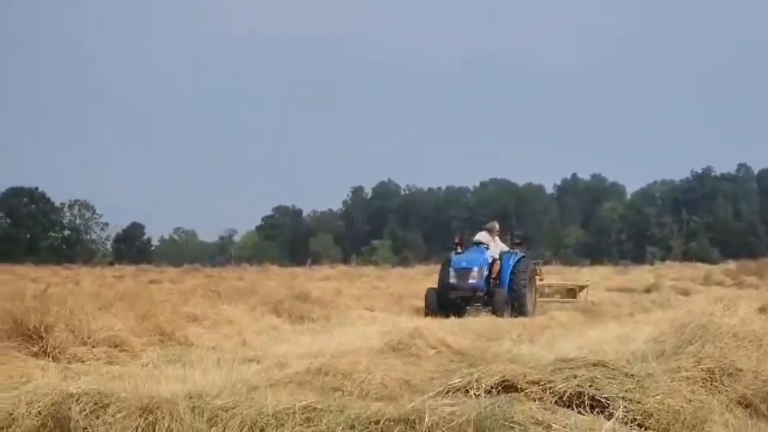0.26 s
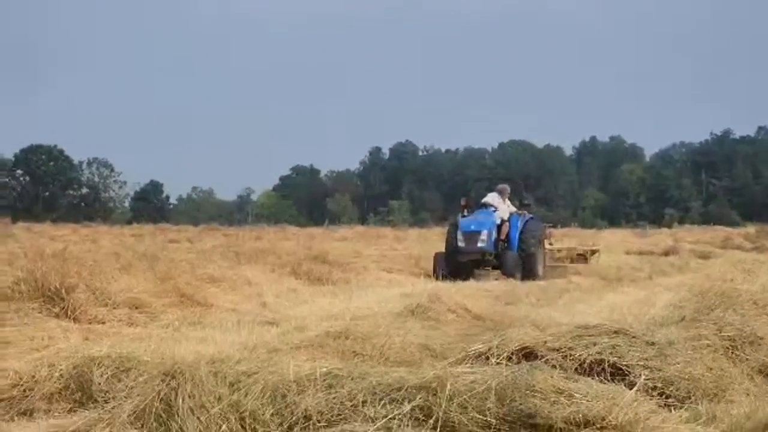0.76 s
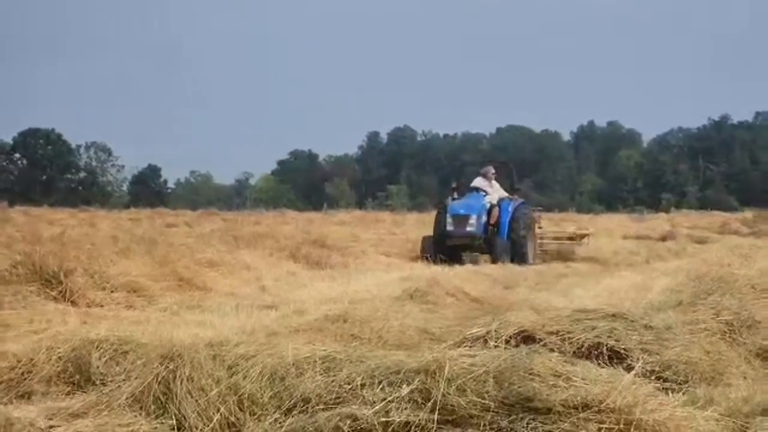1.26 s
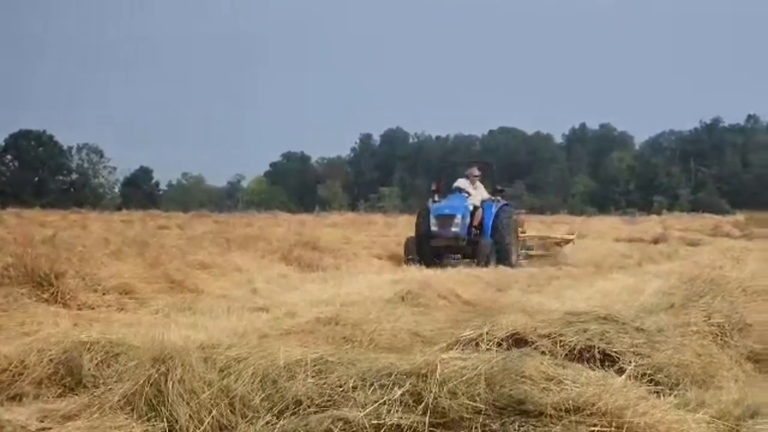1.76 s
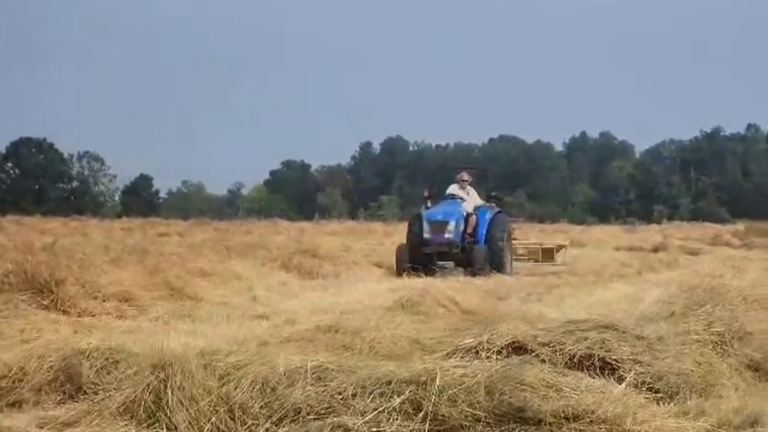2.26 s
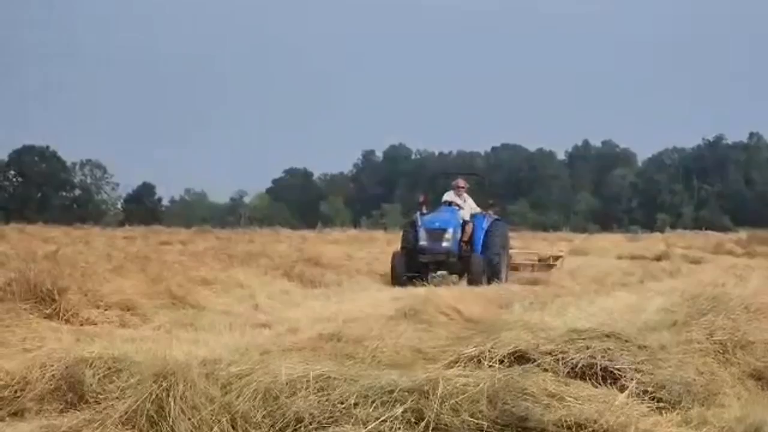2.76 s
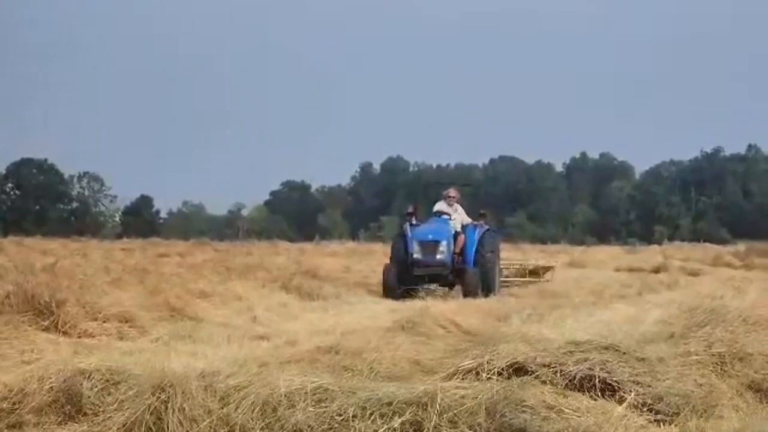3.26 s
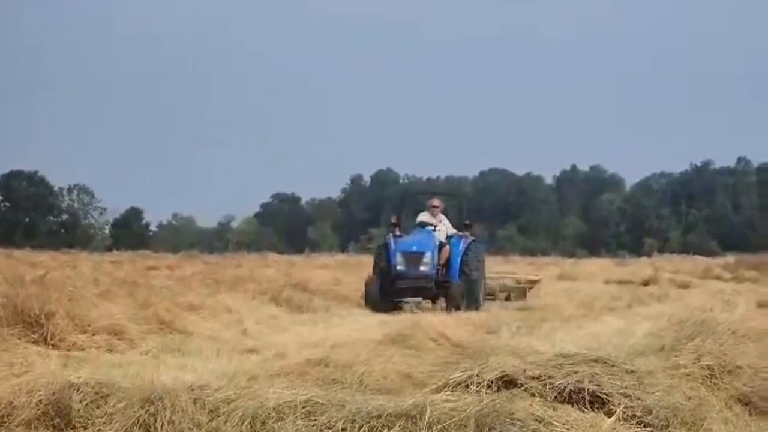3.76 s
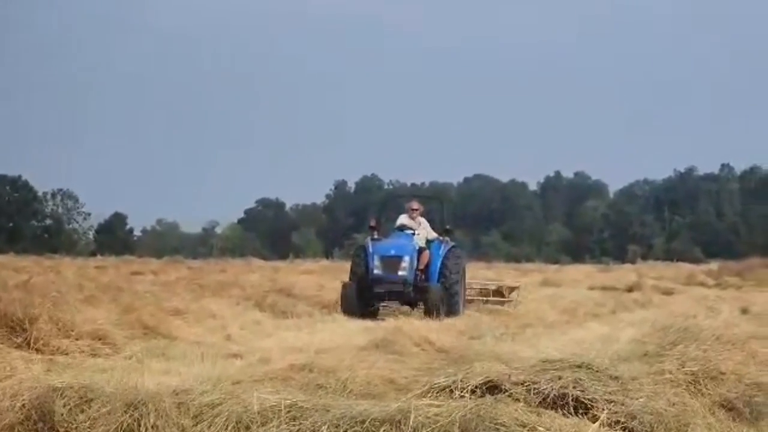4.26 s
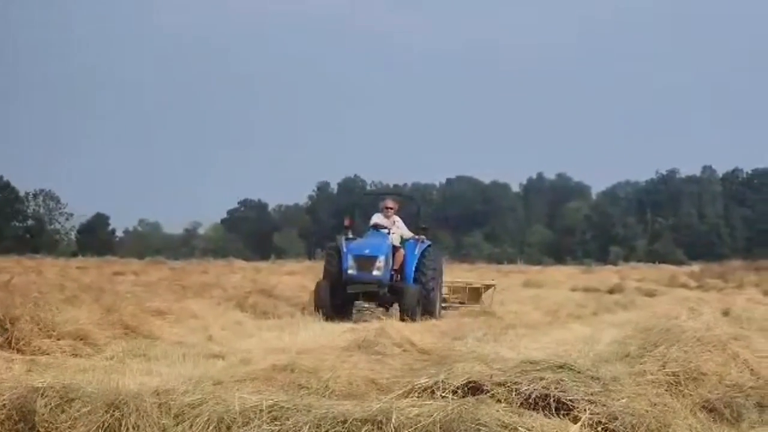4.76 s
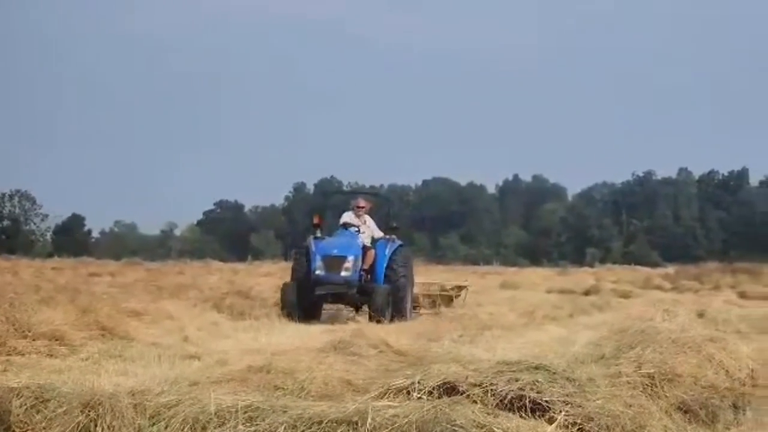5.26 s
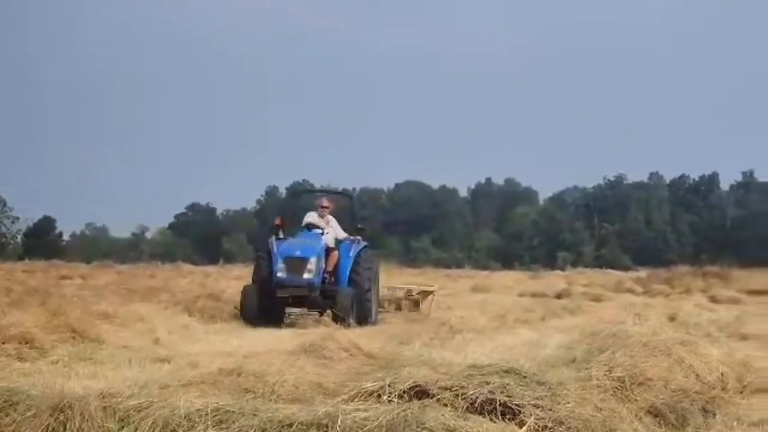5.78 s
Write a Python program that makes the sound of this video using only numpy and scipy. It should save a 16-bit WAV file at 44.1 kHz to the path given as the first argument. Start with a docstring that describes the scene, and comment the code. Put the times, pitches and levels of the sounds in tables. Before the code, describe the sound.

Outdoors in an open hay field, a diesel tractor drones steadily some distance off, gradually growing stronger as it nears. Rapid soft engine knocking blends with grainy mid-range clatter and irregular clanks from the towed rake, hardest around four and a half seconds. Close to the handheld stereo microphone, the breeze rumbles and thumps, dry straw rustles faintly, and a thin hiss remains.

```python
"""A low, uneven engine hum runs throughout under a rumbling breeze: a diesel tractor draws a hay rake across
an open field towards a hand-held pair of microphone ports. Its exhaust is a few wavering sines over
turbulence, its block is noise puffing with each knock; rake clanks and the loudest knocks are short bursts.
Close by, the breeze buffets the ports as low noise and single pulses, and dry straw rustles in tiny snaps.
The ports drop the deepest bass and add a faint, flickering hiss."""
import sys
import numpy as np
from scipy import signal
from scipy.fft import rfft, irfft
from scipy.io import wavfile
from scipy.ndimage import uniform_filter1d, map_coordinates

SR = 44100
rng = np.random.default_rng(int(sys.argv[2]) if len(sys.argv) > 2 else 0)


def wrap_up_sound(samples):
    """Save the sound to the file named by the first command line argument, as 16-bit audio."""
    columns = np.atleast_2d(samples).T
    # keep every value between -1 and 1, then stretch to whole-number steps
    tamed = np.clip(columns, -1, 1)
    steps = np.round(tamed * 32767).astype(np.int16)
    wavfile.write(sys.argv[1], SR, steps)


N = 265570


def gain_of(db):
    """Decibels to an amplitude factor."""
    return 10 ** (np.asarray(db) / 20)


def evened(x):
    """Scales to rms 1, taking all rows together."""
    return x / np.sqrt(np.mean(x ** 2) + 1e-20)


def read(points, column=1):
    """A column of a spectrum table at every bin, interpolated on a log-frequency axis."""
    table = np.array(points, float)
    bins_hz = np.fft.rfftfreq(N, 1 / SR)
    return np.interp(np.log(bins_hz + 1), np.log(table[:, 0] + 1), table[:, column])


def follow(rows):
    """The columns of a time table at every sample."""
    times_s, *columns = np.transpose(rows)
    return [np.interp(np.arange(N) / SR, times_s, column) for column in columns]


def coloured(x, points):
    """Filters by a spectrum table that falls away beyond its ends."""
    table = [(0.0044, -93)] + list(points) + [(22050, -77.0)]
    return irfft(rfft(x) * gain_of(read(table)), N)


def wander(top_hz):
    """Slow random drift of rms 1: low-passed noise."""
    lowpass = signal.butter(N=2, Wn=top_hz, fs=SR, output="sos")
    return evened(signal.sosfilt(lowpass, rng.standard_normal(N)))


def add(mix, start_s, sound):
    """Mixes a sound in at a time, cut off at the end of the scene."""
    part = mix[max(round(start_s * SR), 0):][:len(sound)]
    part += sound[:len(part)]


def split(x, left_db):
    """Shares a sound between the ports, the left louder by left_db."""
    return np.array([x * gain_of(left_db / 2), x * gain_of(-left_db / 2)])


# exhaust orders: (multiple of the knock rate, relative level [dB])
EXHAUST_ORDERS = [(0.999, -3), (1.5, -5.5), (3, 0.5), (3.75, -10.5), (4.2, -12.5), (5, -17)]
# exhaust turbulence: (frequency [Hz], relative density [dB])
EXHAUST_TURBULENCE = [(60, 5.5), (100, 4.5), (150, -1), (190, -8), (240, -13), (320, -24.5)]
# the second multiple swells on its own: (time [s], level [dB])
SECOND_ORDER_LEVEL = [(0.0, -39.5), (0.7, -47), (1.0, -47), (1.42, -40), (1.56, -63), (1.76, -35),
                      (1.98, -55), (2.04, -33), (2.55, -34), (2.93, -49.5), (3.02, -28.5), (3.15, -37),
                      (3.2, -51.5), (4.29, -35.5), (4.41, -58), (4.58, -26.5), (4.68, -34.5), (5.33, -28.5),
                      (5.38, -42), (6.02, -31.5)]


def exhaust(turns, level_db):
    """Low orders as sines wavering in strength and phase, over turbulence; two rows differ in their noise."""
    tones = 0
    for multiple, order_db in EXHAUST_ORDERS:
        strength = np.sqrt(2) * gain_of(order_db + 3.2 * wander(8))
        cycles = multiple * turns + rng.random() + 0.038 * multiple * wander(7)
        tones = tones + strength * np.sin(2 * np.pi * cycles)
    turbulence = evened(coloured(rng.standard_normal((2, N)), EXHAUST_TURBULENCE))
    drone = turbulence * gain_of(-4.0 + 2.7 * wander(13.0))
    second_cycles = 2 * turns + rng.random() + 0.11 * wander(8.0)
    second_strength = np.sqrt(2) * gain_of(follow(SECOND_ORDER_LEVEL)[0])
    return gain_of(level_db) * (tones + drone) + second_strength * np.sin(2 * np.pi * second_cycles)


# broad engine noise at the left port: (frequency [Hz], relative density [dB])
CLATTER_SPECTRUM = [(300, -12.5), (470, -16.5), (560, -7.5), (800, -7.5), (1200, -4.5), (1500, -1),
                    (1750, -5.5), (2200, -4), (2600, -11), (3200, -7), (3700, -17), (4200, -18.5),
                    (4850, -22.5), (5100, -29.5), (6500, -39), (8000, -66.5)]
# resonances of the engine block: (frequency [Hz], width [Hz], relative level [dB])
BLOCK_MODES = [(1085, 60, -6), (1332, 75, 0), (1930, 100, -9), (2990, 110, -9), (4060, 90, -18),
               (4262, 45, -17), (4780, 80, -22)]


def clatter(turns, level_db, tilt_db):
    """Noise puffs with each knock, wide and through the resonances of the block; knocks differ in strength."""
    strength = gain_of(3.5 * rng.standard_normal(400))[turns.astype(int)]  # one draw per knock
    puff = strength * np.sin(np.pi * (turns % 1)) ** 4
    wide = evened((1 + .18 * puff) * rng.standard_normal((2, N)))
    drive = evened((1 + .9 * puff) * rng.standard_normal((2, N)))
    hz = np.fft.rfftfreq(N, 1 / SR)
    power = sum(gain_of(2 * db) / (1 + (2 * (hz - f) / width) ** 2) ** 2 for f, width, db in BLOCK_MODES)
    ringing = irfft(rfft(drive) * np.sqrt(power), N) * gain_of(3)
    engine = coloured(wide, CLATTER_SPECTRUM) + ringing
    return gain_of(level_db) * evened(patchy(engine, 2.03, tilt_db))


def patchy(x, depth_db, tilt_db):
    """Level drifts in patches, brief and wide or long and narrow, as moving air and hay lie between; slow tilt."""
    streaks_db = 2.3  # narrow partials come and go
    hz, t, z = signal.stft(x, SR, nperseg=1024, noverlap=896)
    brief, lasting = rng.standard_normal((2, *z.shape[1:]))
    brief = evened(uniform_filter1d(uniform_filter1d(brief, size=10, axis=0), size=7, axis=1))
    lasting = evened(uniform_filter1d(uniform_filter1d(lasting, size=2, axis=0), size=45, axis=1))
    octaves = np.log2(np.clip(hz, 500, 8000) / 1800)[:, None]
    tilt = octaves * np.interp(t, np.arange(N) / SR, tilt_db)
    z = z * gain_of(depth_db * brief + streaks_db * lasting + tilt)
    return signal.istft(z, SR, nperseg=1024, noverlap=896)[1][:, :N]


# rake clanks and the loudest engine knocks: (time [s], rattle level [dB], centre [Hz], spread [octaves],
# length [s], tine chatter level [dB]); the burst's envelope shapes both levels
CLANKS_AND_LOUD_KNOCKS = [(0.231, -50.5, 2480, 1.1, 0.041, -62), (0.312, -45.5, 1900, 0.56, 0.12, -70),
                          (0.421, -47.5, 2550, 0.74, 0.054, -79), (0.538, -45.5, 1560, 0.12, 0.039, -79),
                          (0.674, -39, 1480, 0.69, 0.014, -60), (0.703, -45, 3200, 0.39, 0.021, -55),
                          (0.847, -47.5, 2400, 0.88, 0.05, -63.5), (1.073, -46, 1330, 0.85, 0.044, -69),
                          (1.201, -37.5, 1430, 0.27, 0.028, -65), (1.208, -40, 915, 0.27, 0.0068, -68),
                          (1.221, -43.5, 900, 0.2, 0.016, -68), (1.347, -49, 1480, 0.7, 0.029, -71),
                          (1.493, -41.5, 1850, 0.77, 0.049, -73), (1.757, -49, 1430, 0.79, 0.023, -66),
                          (2.068, -49, 3720, 0.89, 0.033, -63), (2.152, -42.5, 1410, 0.43, 0.074, -66.5),
                          (2.224, -56, 4000, 0.26, 0.054, -72), (2.273, -40, 1500, 0.27, 0.02, -72),
                          (2.275, -44.5, 3100, 0.23, 0.029, -70), (2.305, -43, 1750, 1, 0.097, -76.5),
                          (2.438, -59, 1345, 0.21, 0.039, -78), (2.536, -39.5, 1350, 0.3, 0.0087, -68),
                          (2.537, -45, 2990, 0.27, 0.007, -69), (2.898, -51.5, 2590, 0.88, 0.053, -67),
                          (2.923, -49, 3040, 0.18, 0.026, -74), (3.41, -59, 1390, 0.75, 0.026, -63),
                          (3.557, -55, 1420, 0.45, 0.01, -70), (3.673, -41.5, 1440, 0.52, 0.066, -62.5),
                          (3.984, -44, 1430, 0.77, 0.067, -74), (4.065, -44, 2170, 0.18, 0.024, -76),
                          (4.099, -44, 2170, 1.1, 0.033, -68), (4.137, -40, 1500, 0.65, .03, -56),
                          (4.26, -47, 1400, 0.46, .02, -60), (4.314, -56, 3000, 0.77, 0.018, -61),
                          (4.282, -51.5, 2880, 0.79, 0.06, -69), (4.523, -47.5, 4500, 0.4, 0.02, -56.5),
                          (4.536, -40, 2900, 0.63, 0.053, -60.5), (4.55, -32, 2870, .6, 0.01, -68),
                          (4.616, -39.5, 2840, 0.33, 0.035, -57.5), (4.621, -36.5, 1094, .9, 0.036, -54),
                          (4.632, -35, 1460, 0.17, 0.013, -62.5), (4.644, -48.5, 1500, 0.97, 0.037, -69),
                          (4.852, -40.5, 1450, 0.79, 0.017, -61), (4.975, -43, 1200, 0.79, 0.014, -73),
                          (4.99, -41, 1600, 0.88, 0.047, -71), (5.423, -46, 1520, 1.1, 0.019, -75),
                          (5.659, -45, 2920, 0.24, 0.039, -64)]
# smaller clanks at random moments; ranges of the same columns after the time
SMALL_CLANKS = 40
SMALL_LOW, SMALL_HIGH = (-56, 1000, .3, .005, -74), (-48, 3000, .8, 0.02, -67)
# thin spring tines: (frequency [Hz], width [Hz], relative level [dB])
TINE_MODES = [(3957, 35, 2), (4262, 30, 4), (4561, 35, 0), (4782, 50, 2), (5411, 55, -3), (5986, 30, -3),
              (6160, 40, -7), (6558, 30, -2), (6831, 40, -5), (7304, 30, -6)]
# blows hard enough to ring the frame: (time [s], ring level [dB])
HARD_BLOWS = [(4.542, -26.5)]
# modes of the steel frame: (frequency [Hz], relative level [dB], time to fall 60 dB [s])
FRAME_MODES = [(894, -16, .1), (1432, -6, .1), (2159, 0, .4), (2215, -11, .15), (2487, -13, .12),
               (2837, -10, .1), (2990, -6, .06), (3198, -13, .06), (3838, -15, .1), (4262, -10, .08),
               (4511, -13, .06), (4782, -16, .05), (5411, -26, .05)]


def rake_and_loud_knocks():
    """Each clank or loud knock is a rattle with thin chatter; a hard blow rings the frame until hay damps it."""
    partials_db = 2.5  # each burst excites its own uneven set of partials
    out, t = np.zeros((2, N)), np.arange(4096) / SR
    hz = np.fft.rfftfreq(len(t), 1 / SR) + 1
    tines = sum(gain_of(db) / (1 + 2j * (hz - f) / width) for f, width, db in TINE_MODES)
    tines = tines / (1 + (hz / 8500) ** 5)
    columns = len(CLANKS_AND_LOUD_KNOCKS[0])
    small = rng.uniform((0, *SMALL_LOW), (N / SR, *SMALL_HIGH), (SMALL_CLANKS, columns))
    bursts = np.vstack([small, CLANKS_AND_LOUD_KNOCKS])
    for start_s, rattle_db, centre_hz, spread, length, tines_db in bursts:
        *draws, pick = rng.standard_normal((3, len(t)))
        blow = (1 - np.exp(-(t / (0.081 * length)) ** 2)) * np.exp(-(t / length) ** 2)
        hump = 1 / (1 + (np.log2(hz / centre_hz) / spread) ** 4)
        hump = hump / (1 + (hz / 4800) ** 8) / (1 + (600 / hz) ** 4)
        hump = hump * gain_of(partials_db * np.interp(hz / 70, np.arange(len(pick)), pick))
        for row, draw in zip(out, draws):
            rattle = evened(irfft(rfft(draw) * hump, len(t)))
            chatter = evened(irfft(rfft(draw) * tines, len(t)))
            add(row, start_s, (gain_of(rattle_db) * rattle + gain_of(tines_db) * chatter) * blow)
    damped = (1 - np.exp(-t / .001)) * np.exp(-(t / .054) ** 8)
    for start_s, ring_db in HARD_BLOWS:
        ring = 0
        for f, mode_db, t60 in FRAME_MODES:
            ring = ring + gain_of(mode_db - 60 * t / t60) * np.sin(2 * np.pi * (f * t + rng.random()))
        add(out[0], start_s, gain_of(ring_db) * ring * damped)  # first row only: the ring is not scattered
    return out


# right port against left for the far tractor: (frequency [Hz], likeness [0-1], left lead [rad],
# left louder [dB])
PORT_DIFFERENCE = [(40, .8, .1, 2), (140, .75, .15, 3), (345, .85, .2, 1), (600, .68, .4, .5),
                   (860, .76, .65, -1.5), (1030, .7, 1.3, -2), (1200, .75, 1.8, -.5), (1380, .82, 1.95, -2),
                   (1550, .93, 2.8, -.5), (1720, .93, 3.0, 0), (1900, .75, 3.45, -2.5),
                   (2150, .5, 4.7, 5.5), (2400, .55, 4.2, 6.5), (2750, .5, 4.5, 7), (3100, .68, 4.9, 8),
                   (3600, .4, 6.5, 13), (4300, .4, 7.3, 13), (5200, .3, 7.7, 19), (8350, .3, 12, 17)]
# the scattered part fades as the tractor nears: (level at the start [dB], at the end [dB])
SCATTER_LEVEL = (2, -6)
# the right port hears the tractor later as it crosses: (advance at the start [samples], at the end [samples])
CROSSING_ADVANCE = (.9, -.9)


def ports(far):
    """The right port hears the first row later and duller, mixed with an unlike part scattered off the hay."""
    far = far * signal.windows.tukey(N, .002)  # soft ends keep the filter from clicking
    direct = rfft(far[0])
    scattered = rfft(far[1] * gain_of(np.linspace(*SCATTER_LEVEL, N)))
    likeness = np.clip(read(PORT_DIFFERENCE), 0, 1)
    lag = np.exp(-1j * read(PORT_DIFFERENCE, column=2))
    right = likeness * lag * direct + np.sqrt(1 - likeness ** 2) * scattered
    right = irfft(right / gain_of(read(PORT_DIFFERENCE, column=3)), N)
    moments = np.arange(N) + np.linspace(*CROSSING_ADVANCE, N)
    return np.array([far[0], map_coordinates(right, [moments], order=3, mode="mirror")])


# the breeze swells and drops: (time [s], level [dB], left louder [dB])
BREEZE_LEVEL = [(0, -33.5, 4), (.45, -32, 11), (.74, -35, 14), (.79, -33, -4), (.95, -47, 23),
                (1.16, -24, 7), (1.21, -56, -8), (1.3, -36.5, 10), (1.9, -41.5, 20), (2.15, -27, 0.5),
                (2.48, -29.5, 2.5), (2.56, -36, 11), (2.9, -34.5, 4), (3.12, -25.5, 9), (3.2, -41, 14.5),
                (3.47, -37.5, 0), (3.63, -41, 1), (3.86, -26, 10.5), (4.05, -39.5, 0), (4.3, -29.5, -10),
                (4.45, -38.5, -9), (4.56, -22, 8.5), (4.9, -38.5, -8), (5.12, -25, -1.5), (5.5, -36.5, -10),
                (5.85, -36.5, -10.5), (6.02, -38, -19)]
# low turbulence: (frequency [Hz], relative density [dB])
BREEZE_SPECTRUM = [(12, -34), (20, 11), (43, 8), (118, -8), (244, -22), (321, -39), (450, -34.5),
                   (580, -50.5), (990, -120)]
# single buffets: (centre time [s], peak level [dB], pitch [Hz], left louder [dB], 1 push or -1 suction)
SINGLE_BUFFETS = [(0.173, -54, 60, 3, 1), (0.715, -18.5, 64, 8, -1), (0.746, -19, 59, 1, -1),
                  (1.156, -46, 72, 11, 1), (1.745, -18, 65.5, 3, 1), (2.291, -33, 218, 0, 1),
                  (2.422, -25.5, 65, 15, -1), (2.504, -17.5, 71, -1, 1), (3.135, -19, 67, -18, -1),
                  (3.136, -34.5, 244, -10, -1), (3.468, -28, 67, 14, 1), (3.953, -24.5, 59.6, 20, 1),
                  (4.983, -17, 65.5, 10, 1), (5.119, -14, 79.5, 9, 1), (5.156, -15, 79.8, 13.5, 1),
                  (5.309, -15.5, 59.5, -12, 1), (5.4, -27, 64.6, -15, 1)]


def breeze():
    """Lumpy low turbulence, mostly its own at each port, and single buffets of about one cycle."""
    level_db, left_db = follow(BREEZE_LEVEL)
    shared, left, right = (evened(coloured(rng.standard_normal(N), BREEZE_SPECTRUM)) for _ in range(3))
    out = np.array([.25 * shared + .97 * left, .25 * shared + .97 * right])
    lumps_db = np.array([3.2 * wander(10), 3.2 * wander(10)])  # each port's own unevenness
    out *= gain_of(lumps_db) * split(gain_of(level_db), left_db)
    t = np.arange(-1764, 1764) / SR
    for centre_s, peak_db, hz, pan_db, push in SINGLE_BUFFETS:
        u = t * hz * np.pi
        pulse = np.sign(push) * gain_of(peak_db) * (1 - 2 * u ** 2) * np.exp(-u ** 2)
        for port, sound in zip(out, split(pulse, pan_db)):
            add(port, centre_s + t[0], sound)
    return out


# gusts flutter higher when they strike a port: (time [s], level [dB], left louder [dB])
FLUTTER_LEVEL = [(0.0, -48.5, 4.5), (1.31, -47.5, -4), (1.34, -47, 5), (1.44, -54.5, 0), (2.18, -53, -1.0),
                 (2.38, -47.5, 1), (2.51, -65, -5), (2.63, -43, -2), (2.68, -51.5, 1), (3.75, -49, 1.0),
                 (3.79, -48.5, 1.5), (4.07, -48, -7), (4.14, -35, 8), (4.19, -52, -1), (4.36, -53, -1.5),
                 (4.44, -50, 10), (4.54, -46.5, -3), (4.58, -39, 12), (4.64, -44.5, 1.0), (4.93, -52.5, -2),
                 (5.06, -43.5, 12), (5.26, -43.5, -8), (5.67, -49, 0.5), (6.02, -48, -1.5)]
# faster turbulence: (frequency [Hz], relative density [dB])
FLUTTER_SPECTRUM = [(90, -17), (150, 3), (230, -3.5), (320, -17.5), (450, -25.5), (900, -71)]


def flutter():
    """The faster, lumpy part of the turbulence, partly shared by the two ports."""
    level_db, left_db = follow(FLUTTER_LEVEL)
    shared, left, right = evened(coloured(rng.standard_normal((3, N)), FLUTTER_SPECTRUM))
    noise = np.array([.85 * shared + .53 * left, .85 * shared + .53 * right])
    return noise * gain_of(2.8 * wander(10.9)) * split(gain_of(level_db), left_db)


# straw rustles close by: (time [s], level before the envelope [dB], length [s], left louder [dB])
CLEAR_RUSTLES = [(0.653, -58, 0.027, 10), (0.671, -44.5, 0.0097, 2), (0.679, -53, 0.03, 13),
                 (0.708, -62, 0.037, 19), (0.732, -58, 0.029, 8), (0.756, -55, 0.03, -5),
                 (0.769, -56.5, 0.045, 7), (1.216, -64.5, 0.053, 13), (1.238, -64, 0.036, 3),
                 (1.443, -64, 0.019, 15)]
# fainter rustles at random moments; ranges of the same columns after the time
FAINT_RUSTLES = 60
FAINT_LOW, FAINT_HIGH = (-76.5, 0.0076, 1.9), (-62.5, 0.014, 6.5)
# dry straw: (frequency [Hz], relative density [dB])
STRAW_SPECTRUM = [(800, 6), (2000, 6), (4000, 4), (5500, 2), (7500, 0), (8100, -12), (10500, -14),
                  (13000, -13)]


def straw():
    """Clumps of tiny snaps: noise of quickly varying strength, unlike at each port."""
    shape, t = np.zeros((2, N)), np.arange(6000) / SR
    faint = rng.uniform((0, *FAINT_LOW), (N / SR, *FAINT_HIGH), (FAINT_RUSTLES, len(CLEAR_RUSTLES[0])))
    for start_s, level_db, length, left_db in np.vstack([faint, CLEAR_RUSTLES]):
        clump = (1 - np.exp(-(t / (.25 * length)) ** 2)) * np.exp(-(t / length) ** 2)
        for port, sound in zip(shape, split(gain_of(level_db) * clump, left_db)):
            add(port, start_s, sound)
    snaps = rng.standard_normal((2, N)) * gain_of(3.2 * wander(500))
    return shape * evened(coloured(snaps, STRAW_SPECTRUM))


# knock rate of the engine: (time [s], rate [knocks per second])
KNOCK_RATE = [(0, 38.27), (1, 38.27), (2, 37.93), (6.02, 37.93)]
# the hum grows as the tractor nears and surges unevenly: (time [s], level [dB])
HUM_LEVEL = [(0.0, -38), (0.05, -46.5), (0.59, -40.5), (0.72, -40), (0.77, -54), (0.84, -44.5), (1.09, -38),
             (1.32, -47), (1.41, -40), (2.46, -36.5), (3.0, -40.5), (3.12, -34), (3.17, -40.5),
             (3.37, -40.5), (3.44, -31), (3.62, -38), (3.79, -33.5), (4.07, -43), (4.22, -32),
             (4.44, -42.5), (4.49, -35), (5.08, -34.5), (5.13, -31.5), (5.21, -36), (5.72, -35.5),
             (6.02, -37)]
# engine block in motion: (time [s], clatter level [dB], brightness [dB per octave])
CLATTER_MOTION = [(0.0, -49, 1.5), (0.27, -49, -2.2), (0.5, -44.5, 0.4), (1.04, -46.5, -0.7),
                  (1.24, -44.5, -0.6), (1.52, -46, -0.7), (3.55, -43.5, -1), (3.82, -44.5, -0.1),
                  (4.69, -41, -0.75), (4.9, -41.5, -0.5), (5.3, -43.5, -1.5), (6.02, -44.5, 1)]


def scene():
    """The far tractor and rake through the ports, with the breeze and straw close by."""
    turns = np.cumsum(follow(KNOCK_RATE)[0]) / SR + .55  # knocks so far
    far = exhaust(turns, *follow(HUM_LEVEL))
    far = far + clatter(turns, *follow(CLATTER_MOTION)) + rake_and_loud_knocks()
    return ports(far) + breeze() + flutter() + straw()


# preamplifier hiss: (frequency [Hz], left relative density [dB], right relative density [dB])
HISS_SPECTRUM = [(2000, -34.5, -53.5), (3980, -15.5, -29), (9000, -5, -19.5), (11200, -8.5, -19.5),
                 (11300, -0.5, -15.5), (13200, 0, -17.5)]


def record(dry):
    """The capsules drop the deepest bass and add flickering hiss, stronger on the left; then the band limit."""
    highpass = signal.butter(N=4, Wn=36, btype="high", fs=SR, output="sos")
    thinned = signal.sosfilt(highpass, dry)
    hiss_gain = gain_of([read(HISS_SPECTRUM), read(HISS_SPECTRUM, column=2)])
    hiss = irfft(rfft(rng.standard_normal((2, N))) * hiss_gain, N) * gain_of(-66.0 + 1.1 * wander(14))
    faded = (thinned + hiss) * signal.windows.tukey(N, .001)
    padded = np.pad(faded, ((0, 0), (255, 255)), "reflect", reflect_type="odd")
    band_limit = signal.firwin(511, 13050, window=("kaiser", 9), fs=SR)  # low-pass edge in Hz
    return signal.oaconvolve(padded, band_limit[None], "valid")


dry = scene()
out = record(dry)
wrap_up_sound(out)
```